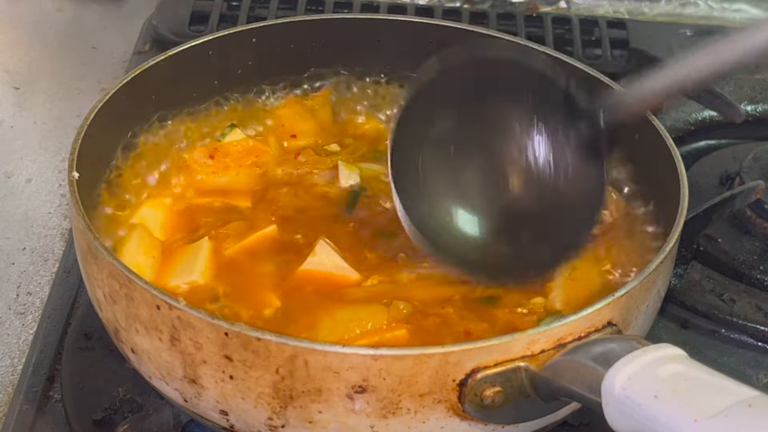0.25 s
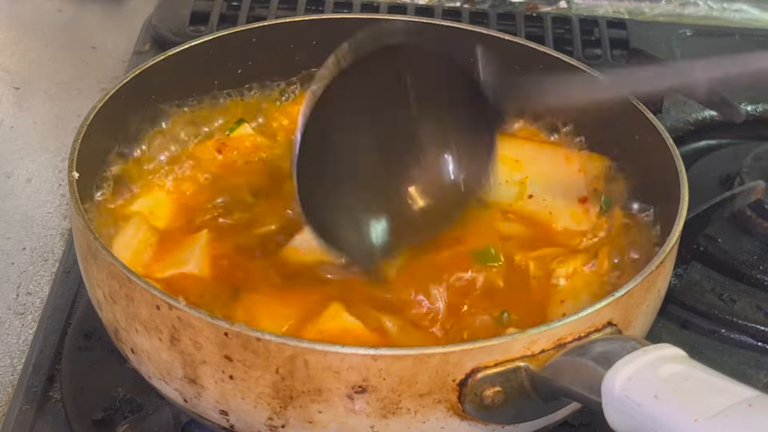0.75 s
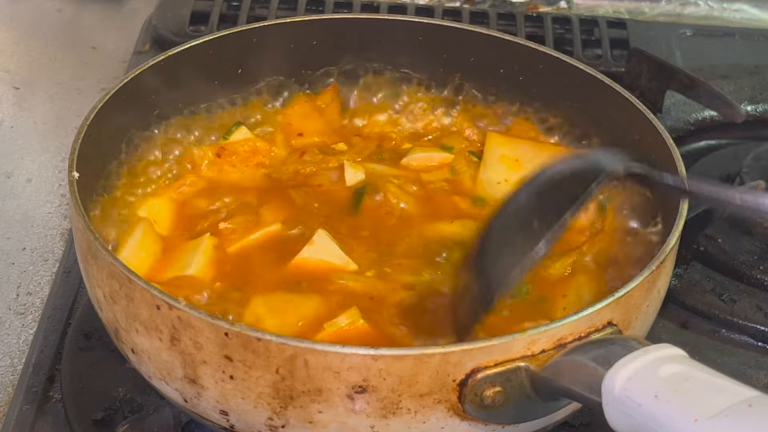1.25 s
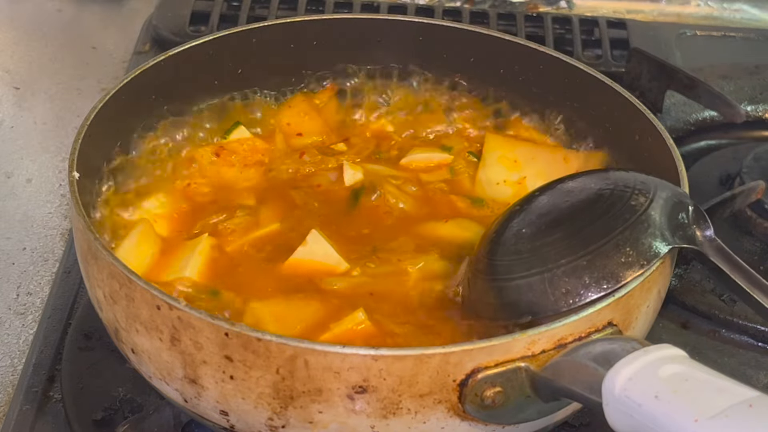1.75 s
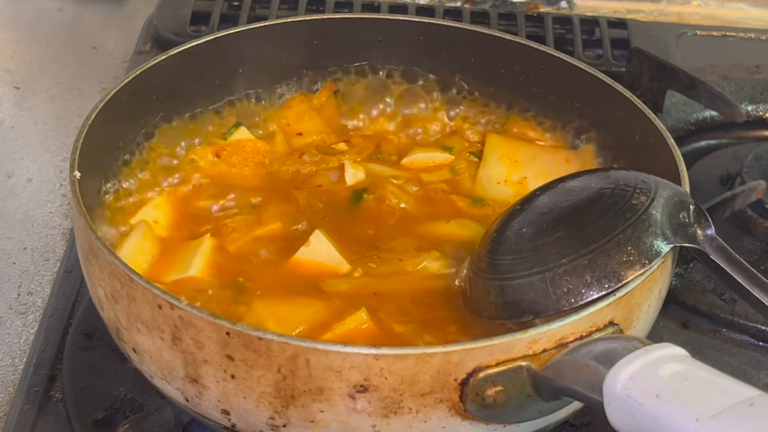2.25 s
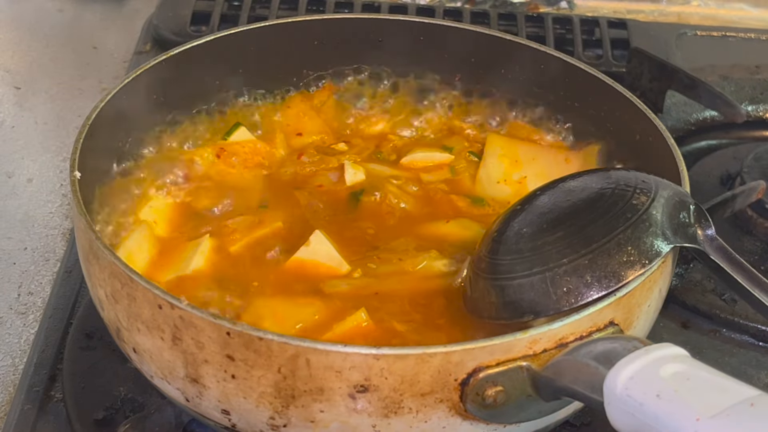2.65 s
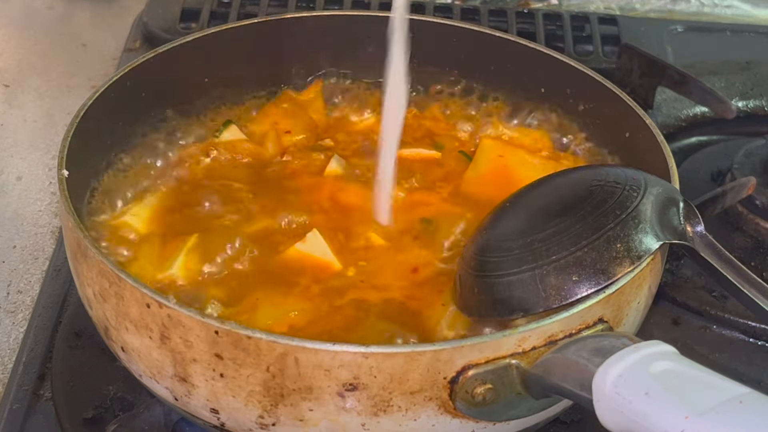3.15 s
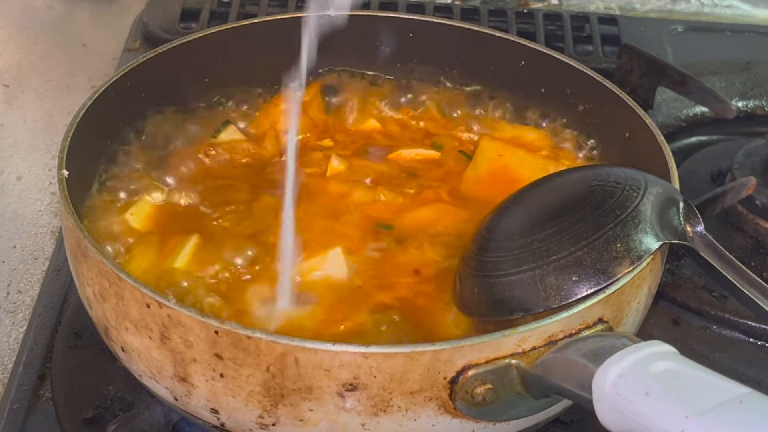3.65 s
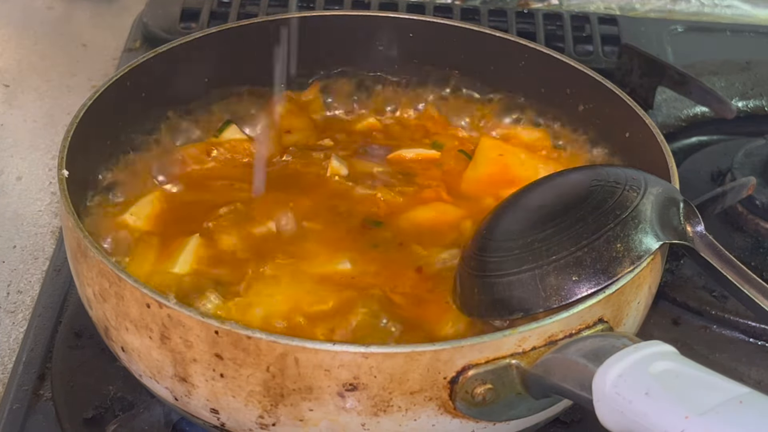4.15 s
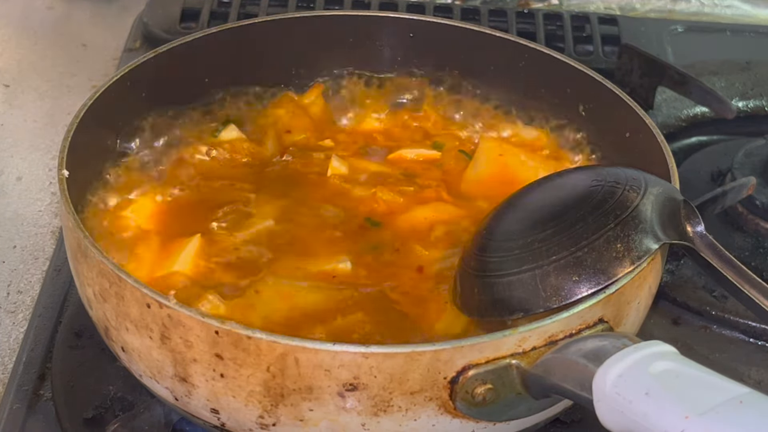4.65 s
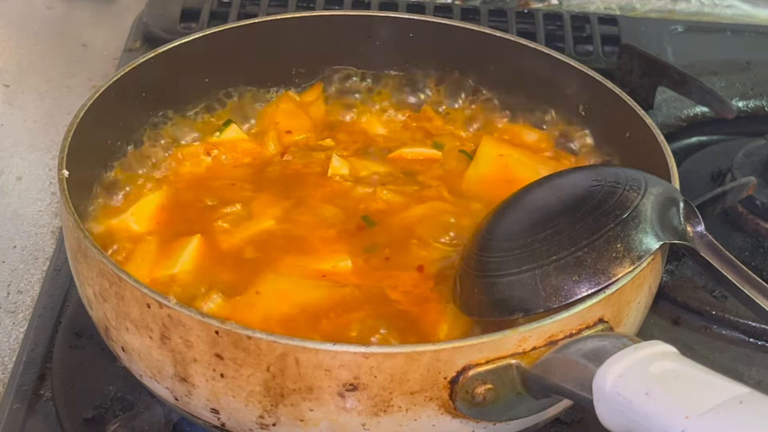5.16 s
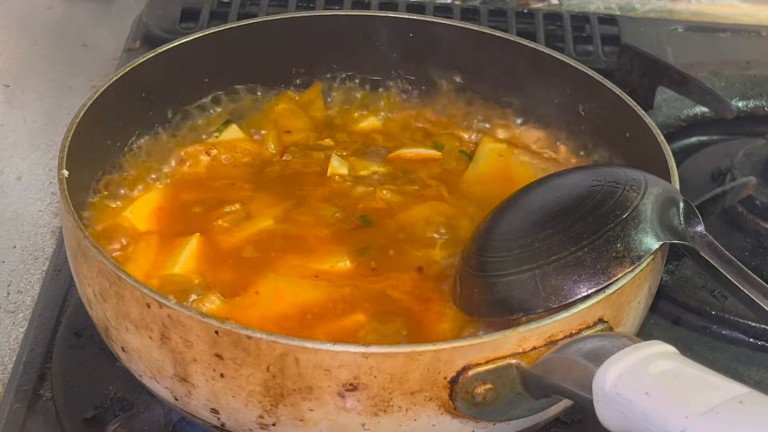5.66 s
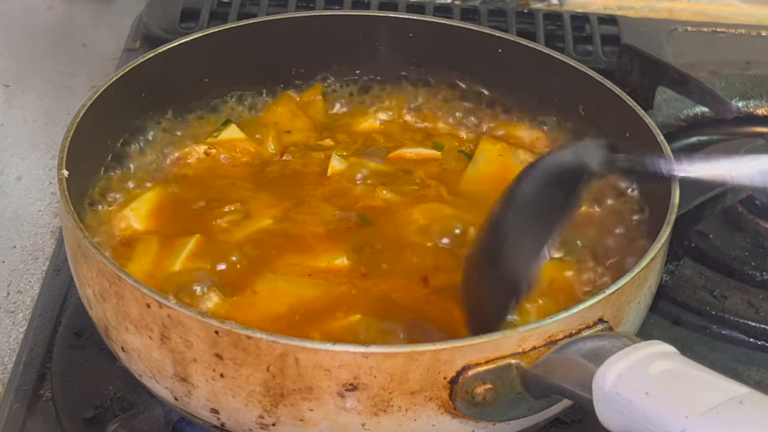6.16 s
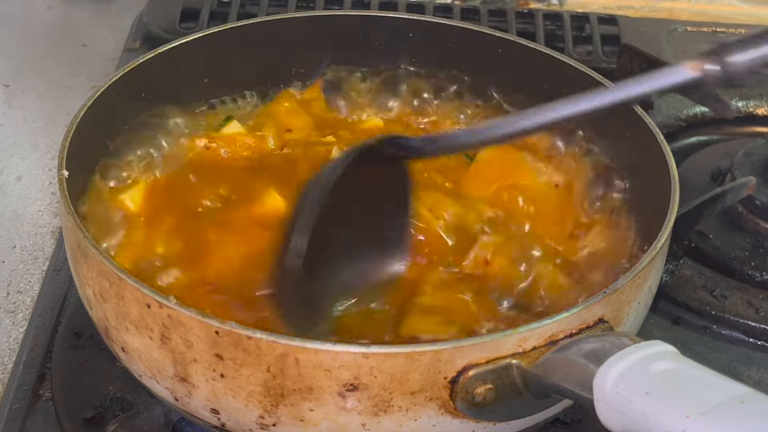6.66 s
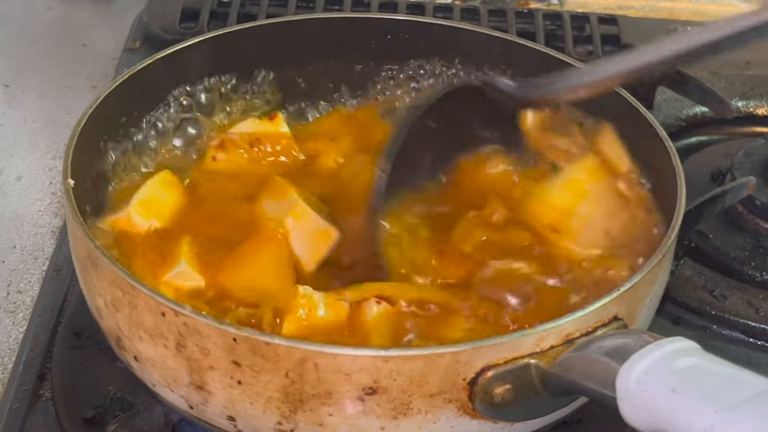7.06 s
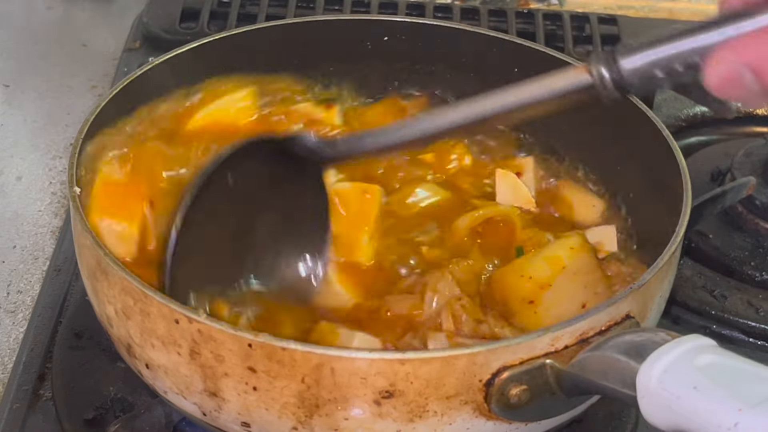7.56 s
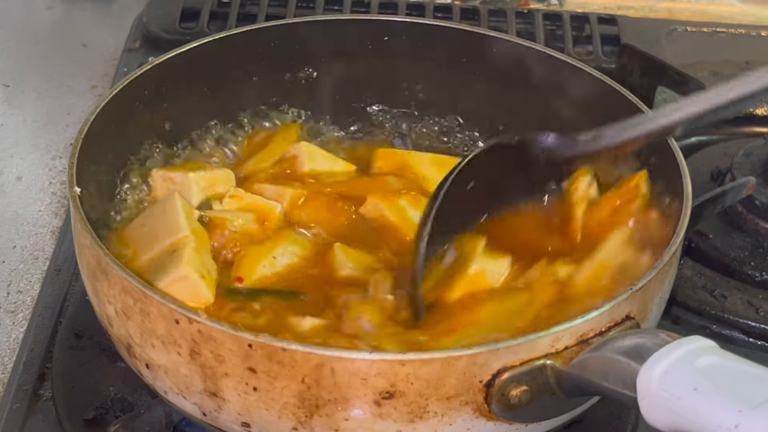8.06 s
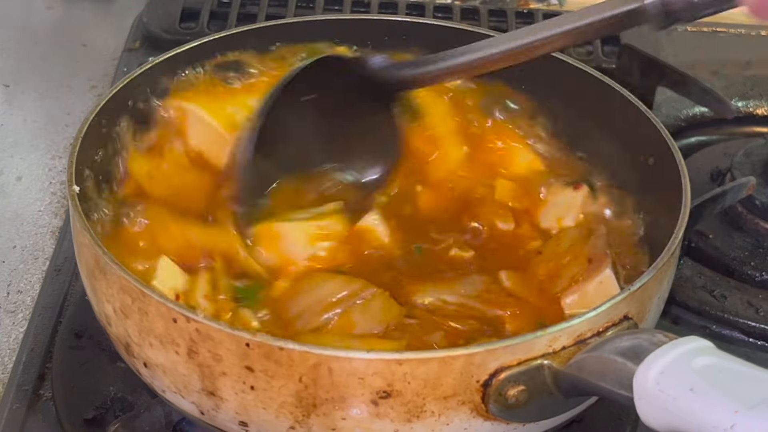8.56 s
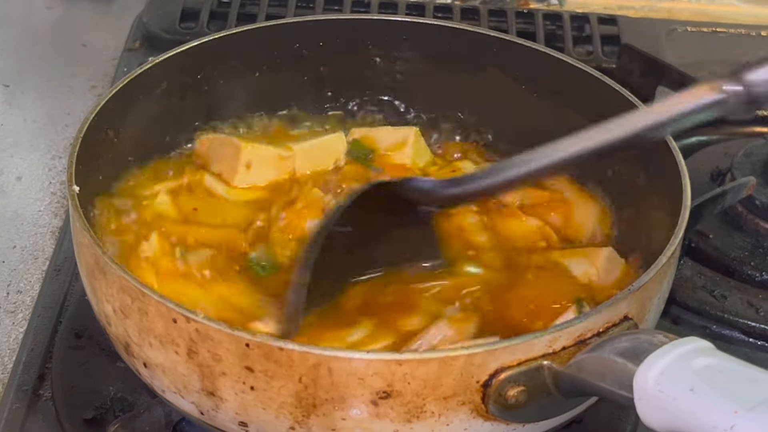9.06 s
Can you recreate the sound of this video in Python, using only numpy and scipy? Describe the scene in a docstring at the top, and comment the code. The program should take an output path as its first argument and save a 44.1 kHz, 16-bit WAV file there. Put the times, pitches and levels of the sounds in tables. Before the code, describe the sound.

A close stereo view of a simmering pan in a small kitchen, lasting a little over nine seconds. Broth bubbles continuously, a dense wet froth with pops and faint metallic pan resonance, over a low flame rumble and fan drone. Around 0.4 s a ladle dips softly; at 1.6 s it drops on the rim with a loud, sharp clack and quick rattle. Dull low thumps follow at about 2 and 2.65 s. From 2.9 to 3.7 s thick liquid pours in, gurgling and spattering with crisp drops, trailing plops until 3.9 s. The boil grows livelier. At 5.1 s a small bowl clinks lightly, again more brightly at 5.3 s, then lands on the counter at 5.5 s with a short hard knock. From 6.4 s the ladle stirs, rubbing and grating in strokes roughly every 0.3 to 0.5 s, with faint taps, while bubbling subsides.

```python
"""In a small kitchen, broth simmers in a frying pan over a gas flame and an extractor fan drones.
Bubbles burst as short damped tones and noise ticks, and the pan's resonances ring faintly with them.
A ladle drops against the rim, thick liquid is poured in, and its small bowl clinks and lands on the counter:
each knock is a noise crack with ringing modes. Then the ladle stirs, and dense clicks through
resonances make it rub and grate over the bottom of the pan."""
import sys
import numpy as np
from scipy import signal
from scipy.fft import rfft, irfft
from scipy.io import wavfile

SR = 44100
rng = np.random.default_rng(int(sys.argv[2]) if len(sys.argv) > 2 else 0)


def store_wav(level_fs):
    """Save 16-bit WAV to argv[1]."""
    pcm = np.round(np.clip(np.atleast_2d(level_fs), -1, 1) * 32767)
    wavfile.write(sys.argv[1], SR, pcm.T.astype(np.int16))


N = 411012  # length [samples]

# vigour of the boil, builds while the pan is left alone, sinks under stirring; its mean is taken out:
# (time [s], relative level [dB])
BOIL = [(0.0, -57.5), (1.47, -55.5), (5.93, -53), (7.43, -58), (9.3, -61)]
# bubbling froth spectrum: (frequency [Hz], relative density [dB per Hz])
FROTH = [(200, 5), (400, 1), (650, 4), (950, -2.5), (1550, -2), (1750, 3), (2100, 1), (2900, -3.5),
         (3700, -12.5), (6000, -33), (14000, -38)]
# fine treble fizz spectrum: (frequency [Hz], relative density [dB per Hz])
FIZZ = [(1500, -5), (3500, -7), (4800, 5), (5600, 0.5), (6500, 1), (7500, -6), (9500, 1), (11000, 5),
        (13000, 6.5), (15700, -7)]
# low resonances of the filled pan: (frequency [Hz], width [Hz], relative level [dB])
PAN_LOW = [(387, 11, -10), (429.3, 16.7, 5.5), (484, 30, -1.5), (534, 20, -6)]
# high resonances of the filled pan: (frequency [Hz], width [Hz], relative level [dB])
PAN_HIGH = [(854, 60, 1), (1155, 49, 0), (1414, 90, -2.5), (1691.5, 28, 6), (1876, 102, 1), (2348, 56, -6),
            (3000, 400, -16)]
# the loudest single bubbles and drops: (time [s], level [dB], starting pitch [Hz])
PLOPS = [(.325, -31.5, 1860), (.590, -31, 3300), (2.352, -31.5, 1760), (2.715, -32, 3200),
         (3.037, -34, 6340), (3.212, -34, 1890), (3.265, -32, 1910), (3.266, -26, 7460), (3.293, -38, 4300),
         (3.324, -38, 4100), (3.338, -25.5, 6360), (3.347, -31.5, 568), (3.361, -32, 4860),
         (3.419, -35, 1050), (3.529, -28.5, 4600), (3.547, -39, 5000), (3.615, -38, 2450),
         (3.638, -33, 1670), (3.663, -31, 7750), (3.681, -36, 4870), (3.682, -32, 750), (3.713, -39, 864),
         (3.753, -35, 1680), (3.805, -44, 4210), (3.827, -31, 1670), (3.83, -32, 720), (3.878, -33, 640),
         (3.921, -29, 1200), (4.785, -34, 854), (4.816, -31, 1800), (5.227, -27, 2050), (5.262, -28, 1830),
         (5.754, -32.5, 1500), (5.805, -34, 1850), (5.959, -30, 765), (6.005, -34, 850), (6.171, -34, 875),
         (6.191, -32.5, 2700), (6.353, -30.5, 1200), (6.415, -34, 1870), (6.463, -31, 740),
         (6.847, -30, 4960), (7.206, -35.5, 5960), (7.207, -34, 12500), (7.233, -28.5, 2730),
         (7.408, -32, 2100)]
# ladle in the broth, rubbing the bottom and washing broth up the wall; length runs to the fade-out:
# (start [s], length [s], rubbing level [dB], wash level [dB])
DIPS = [(0.393, 0.28, -54, -59), (6.35, 2.03, -53.5, -56), (8.413, 1.0, -51, -59)]
# strokes pressing the ladle's edge into the pan:
# (time of hardest pressure [s], low grating level [dB], high grating level [dB])
STROKES = [(.4, -65, -60), (6.62, -48.5, -50), (7.02, -54, -57), (7.34, -64, -55), (7.55, -55, -52),
           (7.86, -55, -51), (8.33, -60, -51), (8.72, -52.5, -48.5), (9.17, -60, -49.5)]
# low resonances of the grating: (frequency [Hz], width [Hz], relative level [dB])
GRATE_LOW = [(1128, 63, 4), (1235, 90, -1), (1386, 110, -0.5)]
# high resonances of the grating: (frequency [Hz], width [Hz], relative level [dB])
GRATE_HIGH = [(1714, 63, 4.5), (1944, 82, 0.5), (2410, 160, -6), (2780, 540, -12)]
# ladle against the pan: (time [s], ring level [dB], crack level [dB], tilt [dB per octave])
LADLE_HITS = [(1.460, -42, -32, 0), (1.631, -14, -15, -.5), (1.6335, -33, -18.5, -0.5),
              (1.646, -34, -23, -1), (1.652, -44, -28, 1), (1.662, -41, -24, 0), (1.675, -45, -23.5, -3.5),
              (1.693, -44, -22, 3.5), (1.698, -38, -22, 0.5), (6.568, -44, -31.5, -1.5),
              (6.649, -50, -39, -2), (6.814, -50, -39, -1), (7.245, -53, -48, -3), (7.505, -48, -45, -3.5),
              (8.012, -48.5, -48, -4), (8.697, -50, -42.5, -1), (9.162, -47, -35.5, -1.5)]
# the bowl clinking: (time [s], ring level [dB], crack level [dB], tilt [dB per octave])
BOWL_HITS = [(5.112, -36, -36, 6), (5.119, -34, -36, 4), (5.137, -35.5, -40, 1.5), (5.319, -24, -42, -1),
             (5.330, -27, -40, 0), (5.360, -25.5, -41, -1), (5.3715, -17.5, -31, 1), (5.398, -42, -48, -1),
             (5.510, -22.5, -33.5, -2)]
# the bowl's foot on the counter: (time [s], ring level [dB], crack level [dB], tilt [dB per octave])
COUNTER_HITS = [(5.4885, -17.5, -14, 0.5), (5.497, -36, -25.5, -1), (5.512, -40, -28, -3)]
# ringing modes of the pan: (frequency [Hz], relative level [dB], t60 [s])
PAN_MODES = [(204, -16, 0.22), (232, -9, 0.17), (250, -6, 0.25), (333, -11, 0.08), (399.7, -2, 0.26),
             (432.6, -2, 0.22), (465, -2.5, 0.065), (492, -9, 0.27), (676, -16, 0.44), (742, -10, .16),
             (803, -1.5, 0.041), (899, -7.5, 0.12), (970, -0.5, 0.021), (970, -11, 0.11), (992, -17, .12),
             (1063, -7, 0.097), (1230, -11, 0.17), (1310, -13, 0.077), (1380, -10.5, 0.15),
             (1749, -10.5, .14), (1825, -4, 0.056), (1875, -12, 0.11), (1965, -16, .08), (2394, -16, .1),
             (2610, -15, 0.16), (2970, -21, 0.24), (3500, -18.5, 0.17), (3737, -18, 0.2), (5240, -19, .12),
             (5950, -12, 0.073)]
# ringing modes of the bowl: (frequency [Hz], relative level [dB], t60 [s])
BOWL_MODES = [(2485, -10.5, 0.1), (2556, -1, 0.077), (2558, -13, 0.13), (2783, -27, .08), (3000, -28, 0.11),
              (3200, -20, .13), (3330, -31, 0.055), (4500, -28, .12), (4800, -20, 0.074),
              (5600, -18.5, 0.084), (5700, -10.5, 0.075), (5660, -23, .22), (5960, -21, 0.08),
              (6654, -19, 0.1), (7000, -27, 0.082), (7700, -25, .15), (9570, -19, 0.11),
              (10180, -19.5, 0.12), (11910, -36, 0.08), (14300, -22, .07), (14660, -18, .08)]
# ringing modes of the counter: (frequency [Hz], relative level [dB], t60 [s])
COUNTER_MODES = [(275, -19, 0.19), (444, -23, 0.33), (523, -17, 0.24), (552, -16, 0.2), (602, -14, 0.23),
                 (664, -11, 0.36), (727, 3, 0.12), (758, -11, .16), (836, -15, 0.17), (900, -20, 0.23),
                 (961, -12, 0.19), (1050, -11, .11), (1200, -17, 0.15), (1275, -16, 0.12), (1330, -7, 0.11),
                 (1443, -21, .18), (1670, -22, 0.11), (1890, -23, 0.08), (2186, -16, 0.11),
                 (2297, -13, 0.091), (2385, 2.5, 0.028)]
# crack of ladle on pan: (frequency [Hz], relative density [dB per Hz])
PAN_CRACK = [(100, -25), (250, -6), (430, 2), (600, -1.5), (1000, 2), (1400, -5), (1800, -2), (2400, -5),
             (3500, -6), (4500, -8), (6000, -10), (7500, -9.5), (12000, -16), (15500, -18)]
# crack of the clinking bowl: (frequency [Hz], relative density [dB per Hz])
BOWL_CRACK = [(500, -10), (2000, -16), (3100, -2), (3900, -5), (5000, -3), (5800, 6), (6400, -7),
              (7500, -3), (9800, -4), (11000, -6.5), (15500, -7.5)]
# crack of bowl on counter: (frequency [Hz], relative density [dB per Hz])
COUNTER_CRACK = [(100, -6), (300, -10), (500, 1), (700, 6), (1000, -5), (1300, -2), (2300, -6),
                 (3200, -21.5), (6500, -28), (14000, -44)]
# low thumps under the pan: (time [s], level [dB], starting pitch [Hz])
THUMPS = [(1.655, -19.5, 76), (1.97, -26, 242), (1.99, -23.5, 85.6), (2.07, -24.5, 233), (2.65, -21, 71.6),
          (4.3, -23, 88.5), (5.515, -20, 107)]
# rumble of the gas flame: (frequency [Hz], relative density [dB per Hz])
FLAME = [(20, -26), (32, -20), (42, 2.5), (60, 1), (85, -0.5), (110, -7), (160, -7), (195, -1.5),
         (235, -5.5), (262, -3), (285, -12.5), (345, -9), (400, -9.5), (600, -21), (1500, -31.5),
         (5000, -41)]
# low drone of the extractor fan: (frequency [Hz], width [Hz], relative level [dB])
DRONE = [(50, 5.4, -3.5), (73, 5.8, -2), (97.2, 4.5, 2), (121.7, 3.65, 3), (142.1, 6.3, -0.5)]
# stereo width: (frequency [Hz], side gain against mid [dB])
WIDTH = [(60, -26.5), (200, -19), (400, -9.5), (700, -5.5), (1300, 1), (1800, -3), (2500, -23), (4400, -56),
         (6500, 2.5), (8400, -68), (10000, -1), (15000, -51)]
# stereo balance: (frequency [Hz], left minus right [dB])
LEAN = [(60, 0), (110, -1), (230, -1), (420, -3), (560, -2), (700, -2.5), (950, 1.5), (1300, -2.5),
        (1800, -5.5), (2400, -1), (3200, 0), (15000, 0.5)]
# phase between the two microphone ports: (frequency [Hz], lead of the left [rad])
PORT_PHASE = [(300, 0), (800, .6), (1200, .7), (1800, .25), (2600, .1), (5200, 0), (6600, -1.05),
              (8400, -3.15), (11200, -6.1), (12700, -6.4), (14600, -9.1), (16000, -9.4)]

# base levels of the bubbling and the fine fizz, and how far chance sways the bubbling [dB]
SIMMER_DB, FIZZ_DB, SIMMER_SWAY_DB = -47, -57, 0.43
# big bubbles' level at mean vigour [dB]; how they and the simmer follow the vigour [dB per dB]
GURGLE_DB, GURGLE_FOLLOWS, SIMMER_FOLLOWS = -58.5, 2.4, 0.38
# the pour: start [s], length up to its fade-out [s], gurgle level [dB]
POUR_START_S, POUR_LENGTH_S, POUR_DB = 2.9, 0.77, -52.5
# spray against gurgle [dB]: from the boil, from the poured stream
BOIL_SPRAY_DB, POUR_SPRAY_DB = -9, -7
# lesser plops by chance: rate [per s], level at mean vigour and its spread either way [dB], pitch range [Hz]
STRAY_PER_S, STRAY_DB, STRAY_SPREAD_DB = 4, -39, 2
STRAY_LOW_HZ, STRAY_HIGH_HZ = 850, 2200
# tick of a bursting skin: level against its plop [dB], t60 [s], width of each of two band-passes [Hz]
TICK_DB, TICK_T60_S, TICK_WIDTH_HZ = -8, 0.023, 1400
# fade of pouring and rubbing, in and out; swell and ease of every stroke [s]
FADE_S, STROKE_ATTACK_S, STROKE_RELEASE_S = 0.23, 0.16, 0.22
# the kitchen: echo level [dB], t60 in the lows and in the treble [s], where the two meet [Hz]
ROOM_DB, ROOM_LOW_T60_S, ROOM_HIGH_T60_S, ROOM_SPLIT_HZ = -13, 0.42, 0.28, 2400
CUTOFF_HZ = 16250  # from here up the final low-pass is 60 dB down


def broth():
    """A froth of countless tiny bubbles, larger ones that stand out of it, and the pan ringing under both."""
    boil_db = SIMMER_DB + SIMMER_FOLLOWS * vigour() + SIMMER_SWAY_DB * drift(3.99)
    froth = from_db(-2.5 + 1.75 * drift(40)) * noise(FROTH)
    pops = from_db(-9.5) * bubbles(per_s=600, spread_db=4.5, low_hz=378, high_hz=3200,
                                   cycles=13.0, tilt_db=-1.0)
    low_ring = from_db(-7.0) * resonant(grains(per_s=900, spread_db=2.0), PAN_LOW)
    high_ring = from_db(-6.5) * resonant(grains(per_s=1200, spread_db=4.5), PAN_HIGH)
    fizz = from_db(2.0 + 1.0 * drift(70)) * noise(FIZZ)
    prickle = from_db(-6.0) * bubbles(per_s=450, spread_db=3.5, low_hz=3000, high_hz=12000,
                                      cycles=26, tilt_db=-1.5, count=12)
    simmer = from_db(boil_db) * (froth + pops + low_ring + high_ring)
    return simmer + from_db(FIZZ_DB) * (fizz + prickle)


def vigour():
    """How hard the broth boils, in dB about its mean."""
    db, = in_time(BOIL)
    return db - db.mean()


def splashing():
    """The broth gurgles and sprays with the vigour of the boil and under the poured stream."""
    boil = from_db(GURGLE_DB + GURGLE_FOLLOWS * vigour())
    pour = from_db(POUR_DB) * swell(POUR_START_S, FADE_S, POUR_LENGTH_S - FADE_S, FADE_S)
    gurgle = bubbles(per_s=220, spread_db=2.2, low_hz=574, high_hz=2920, cycles=11, tilt_db=0)
    # boil and pour add as powers
    gurgle_gain = np.hypot(boil, pour)
    spray_gain = np.hypot(from_db(BOIL_SPRAY_DB) * boil, from_db(POUR_SPRAY_DB) * pour)
    return gurgle_gain * gurgle + spray_gain * spray()


def spray():
    """Fine droplets fall back into the broth as brief high tones."""
    return bubbles(per_s=1400, spread_db=3.5, low_hz=2800, high_hz=7240, cycles=25, tilt_db=7.0, count=12)


def bursts():
    """Single bubbles and drops stand out of the simmer, each with a tick and a few smaller ones in its wake."""
    when, size, pitch = rng.random((int(STRAY_PER_S * N / SR), 3)).T
    at = (when * (N - SR // 10)).astype(int)
    stray_db = STRAY_DB + vigour()[at] + STRAY_SPREAD_DB * (2 * size - 1)
    stray_hz = STRAY_LOW_HZ * (STRAY_HIGH_HZ / STRAY_LOW_HZ) ** pitch
    rows = np.vstack([PLOPS, np.transpose([at / SR, stray_db, stray_hz])])
    drops = spattered(rows, within_s=0.012, spread_octaves=0.54, weaker_db=4.0, count=3)
    return ticks(rows) + plops(drops, cycles=16.8, rise=0.045)


def spattered(rows, within_s, spread_octaves, weaker_db, count=4):
    """Every plop throws off a few smaller ones just after it, at nearby pitches."""
    s, db, hz = np.transpose(rows)
    late, weak, off = rng.random((len(rows), 3, count)).transpose(1, 2, 0)
    small_s = s + within_s * late
    small_db = db - weaker_db * (1 + weak)
    small_hz = hz * 2 ** (spread_octaves * (2 * off - 1))
    small = np.stack([small_s, small_db, small_hz], axis=-1)
    return np.vstack([rows, small.reshape(-1, 3)])


def ticks(rows):
    """A bursting skin gives a short puff of noise around the bubble's pitch."""
    out, t = np.zeros(N), np.arange(SR // 20) / SR
    for (s, db, hz), white in zip(rows, rng.standard_normal((len(rows), len(t)))):
        at = round(s * SR)
        puff = resonance(resonance(white, hz, TICK_WIDTH_HZ), hz, TICK_WIDTH_HZ)
        out[at:at + len(t)] += from_db(db + TICK_DB - 60 * t / TICK_T60_S) * rms_one(puff)
    return out


def plops(rows, cycles, rise):
    """Damped tones, 60 dB down after the given cycles, whose pitch climbs as the cavity shrinks."""
    out = np.zeros(N)
    for s, db, hz in rows:
        at = round(s * SR)
        turn = np.arange(min(int(cycles / hz * SR), N - at)) / SR * hz
        age = turn / cycles  # 0 to 1 over the plop
        tone = np.sin(2 * np.pi * turn * (1 + rise * age))
        onset = 1 - np.exp(-2 * turn)
        out[at:at + len(turn)] += from_db(db - 60 * age) * onset * tone
    return out


def stirring():
    """The ladle's edge catches on the pan bottom: it rubs, washes broth about, and grates with each stroke."""
    catches, seething = grains(per_s=3400, spread_db=2.5), wash()
    rub = resonant(catches, PAN_LOW)
    low = resonant(catches, GRATE_LOW)
    high = resonant(catches, GRATE_HIGH)
    out = np.zeros(N)
    for s, length, rub_db, wash_db in DIPS:
        dipped = from_db(rub_db) * rub + from_db(wash_db) * seething
        out += swell(s, FADE_S, length - FADE_S, FADE_S) * dipped
    for s, low_db, high_db in STROKES:
        grating = from_db(low_db) * low + from_db(high_db) * high
        out += swell(s - STROKE_ATTACK_S, STROKE_ATTACK_S, 0, STROKE_RELEASE_S) * grating
    return out


def wash():
    """Broth swept over the hot wall of the pan seethes softly, in bubbles too many to tell apart."""
    return bubbles(per_s=9000, spread_db=1.0, low_hz=2200, high_hz=7200, cycles=9, tilt_db=1.5, count=12)


def knocks():
    """Ladle on pan, bowl clinking, bowl on counter: each body answers with its own modes and crack."""
    ladle = blows(LADLE_HITS, PAN_MODES, PAN_CRACK, crack_t60=0.039, rattle_db=-15, rattle_t60=0.2,
                  detune=0.0034, contact_s=0.00016, centre_hz=1500, lowest_hz=175)
    bowl = blows(BOWL_HITS, BOWL_MODES, BOWL_CRACK, crack_t60=0.063, rattle_db=-9, rattle_t60=0.15,
                 detune=0.0038, contact_s=0.0002, centre_hz=2800, lowest_hz=400)
    counter = blows(COUNTER_HITS, COUNTER_MODES, COUNTER_CRACK, crack_t60=0.024, rattle_db=-16.0,
                    rattle_t60=0.38, detune=0.004, contact_s=0.00045, centre_hz=1000, lowest_hz=150)
    return ladle + bowl + counter


def blows(rows, modes, crack, crack_t60, rattle_db, rattle_t60, detune, contact_s, centre_hz, lowest_hz):
    """Each contact cracks, rattles briefly and rings the modes; a harder one tilts all this upward."""
    hz, db, t60 = np.transpose(modes)[:, :, None]
    out, t = np.zeros(N + SR), np.arange(SR // 3) / SR
    rise = (1 - np.exp(-t / contact_s)) ** 2
    fall = from_db(-60 * t / crack_t60) + from_db(rattle_db - 60 * t / rattle_t60)
    for s, ring_db, crack_db, tilt_db in rows:
        # chance shifts every mode a little in level [dB], pitch and phase
        stronger, sharper, turn = rng.standard_normal((3, len(modes), 1))
        tones = np.sin(2 * np.pi * (hz * (1 + detune * sharper) * t + turn))
        mode_db = ring_db + db + stronger + tilt_db * np.log2(hz / centre_hz)
        rings = np.sum(from_db(mode_db - 60 * t / t60) * tones, axis=0)
        tilted_crack = [(f, level + tilt_db * np.log2(f / centre_hz)) for f, level in crack]
        crash = noise(tilted_crack, size=len(t))
        at = round(s * SR)
        out[at:at + len(t)] += rise * (rings + from_db(crack_db) * fall * crash)
    # the body radiates no deep bass
    no_bass = signal.butter(2, lowest_hz, "high", fs=SR, output="sos")
    return signal.sosfilt(no_bass, out[:N] + 1e-18)


def stove():
    """The flame rumbles unevenly as coloured noise under the fan's drone of narrow low resonances."""
    flame = from_db(-44.5 + 1.15 * drift(12)) * noise(FLAME)
    band = signal.butter(2, [42, 170], "band", fs=SR, output="sos")
    fan = signal.sosfilt(band, resonant(rng.standard_normal(N), DRONE))
    return flame + from_db(-43.5) * fan


def reflections(x):
    """Dense echoes of unit energy that die away, the treble first."""
    t = np.arange(SR // 2) / SR
    white = rng.standard_normal(len(t)) * (t > .0041)  # silent until the first echo
    low = signal.sosfilt(signal.butter(1, ROOM_SPLIT_HZ, fs=SR, output="sos"), white)
    low_tail = low * from_db(-60 * t / ROOM_LOW_T60_S)
    high_tail = (white - low) * from_db(-60 * t / ROOM_HIGH_T60_S)
    echoes = low_tail + high_tail
    return signal.fftconvolve(x, echoes / np.linalg.norm(echoes))[:N]


def scattered(x, shortest_s, longest_s):
    """Spectrum of x after a detour whose length differs from one frequency to the next; levels are kept."""
    hz = np.fft.rfftfreq(N, 1 / SR)
    knots = np.linspace(0, SR / 2, num=400)
    delay = np.interp(hz, knots, rng.uniform(shortest_s, longest_s, len(knots)))
    # phase is the running sum of delay over frequency
    return rfft(x) * np.exp(-2j * np.pi * np.cumsum(delay) * hz[1])


def bubbles(per_s, spread_db, low_hz, high_hz, cycles, tilt_db, count=22):
    """Bursting bubbles of many sizes, each ringing for a few cycles; tilt is in dB per octave."""
    pops, dealt = grains(per_s, spread_db), rng.integers(0, count, N)
    out = np.zeros(N)
    for k, hz in enumerate(np.geomspace(low_hz, high_hz, count)):
        out += from_db(tilt_db * np.log2(hz / low_hz)) * ring(pops * (dealt == k), hz, cycles / hz)
    return rms_one(out)


def grains(per_s, spread_db):
    """Random clicks that come in clumps, most small and a few large."""
    born = rng.random(N) < per_s * from_db(3 * drift(14)) / SR
    size_db = spread_db * np.minimum(rng.exponential(1, N), 4)
    return born * from_db(size_db) * rng.choice([-1, 1], N)


def ring(clicks, hz, t60):
    """A unit click sets a damped sine of starting height 1 ringing."""
    r, w = from_db(-60 / (t60 * SR)), 2 * np.pi * hz / SR
    return signal.lfilter([0, np.sin(w)], [1, -2 * r * np.cos(w), r * r], clicks + 1e-18)


def resonant(x, resonances):
    """A body rings with whatever excites it: band-passes of alternating sign, summed to unit power."""
    out = np.zeros(len(x))
    for k, (hz, width, db) in enumerate(resonances):
        out += (-1) ** k * from_db(db) * resonance(x, hz, width)
    return rms_one(out)


def resonance(x, hz, width_hz):
    """Band-pass with gain 1 on top."""
    r = np.exp(-np.pi * width_hz / SR)
    zeros = np.array([1, 0, -1]) * (1 - r * r) / 2
    return signal.lfilter(zeros, [1, -2 * r * np.cos(2 * np.pi * hz / SR), r * r], x)


def noise(spectrum, size=N):
    """Coloured noise of unit power."""
    return rms_one(irfft(rfft(rng.standard_normal(size)) * response(spectrum, size), size))


def response(points, size=N):
    """Gain of a spectrum on the FFT grid, drawn over log frequency."""
    hz, db = np.transpose(points)
    return from_db(np.interp(np.log(np.fft.rfftfreq(size, 1 / SR) + 1e-3), np.log(hz), db))


def drift(rate):
    """Smooth chance of unit power, with this many random knots a second."""
    knots = rng.standard_normal(2000)
    return rms_one(np.interp(np.arange(N) / SR * rate, np.arange(len(knots)), knots))


def swell(start_s, attack_s, hold_s, release_s):
    """An envelope of height 1: attack, hold, release."""
    corners = start_s + np.cumsum([0, attack_s, hold_s, release_s])
    return np.interp(np.arange(N) / SR, corners, [0, 1, 1, 0])


def in_time(rows):
    """The columns of a curve, one value a sample."""
    s, *columns = np.transpose(rows)
    return [np.interp(np.arange(N) / SR, s, c) for c in columns]


def rms_one(x):
    """Scale to unit power."""
    return x / np.sqrt(np.mean(x ** 2) + 1e-20)


def from_db(db):
    """Decibels to gain."""
    return 10 ** (np.asarray(db) / 20)


def scene():
    """All sources in the kitchen; echoes off the stove and walls reach the two ears differently."""
    near = broth() + splashing() + bursts() + stirring() + knocks()
    heard = near + from_db(ROOM_DB) * reflections(near)
    thumps = plops(THUMPS, cycles=9.1, rise=0.027)
    mid = rfft(heard + stove() + thumps)
    # the side gets its own draw of flame and fan
    detour = scattered(heard, shortest_s=0.001988, longest_s=.014)
    side = (detour + rfft(stove())) * response(WIDTH)
    return irfft([mid + side, mid - side], N)


def record(dry):
    """The two microphone ports differ in level and phase and ring in the treble; the top is cut."""
    phase = np.interp(np.fft.rfftfreq(N, 1 / SR), *np.transpose(PORT_PHASE))
    # half the difference goes to each side
    left = np.sqrt(response(LEAN)) * np.exp(.5j * phase)
    x = irfft(rfft(dry) * [left, 1 / left], N)
    x = x + from_db(3.5) * resonance(x, 11820, 190) + from_db(-2) * resonance(x, 14200, 160)
    low_pass = signal.cheby2(20, 60, CUTOFF_HZ, fs=SR, output="sos")
    return signal.sosfilt(low_pass, np.clip(x, -1, 1))


dry = scene()
out = record(dry)
store_wav(out)
```